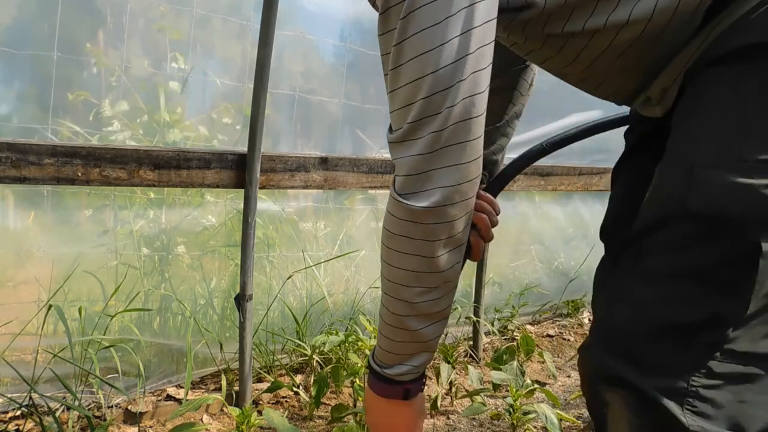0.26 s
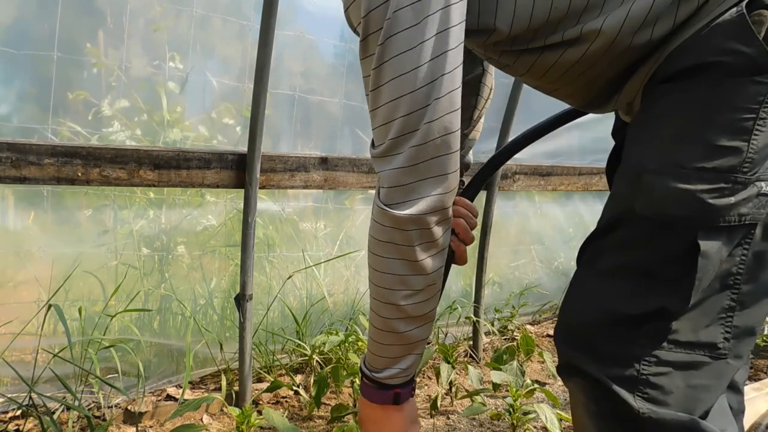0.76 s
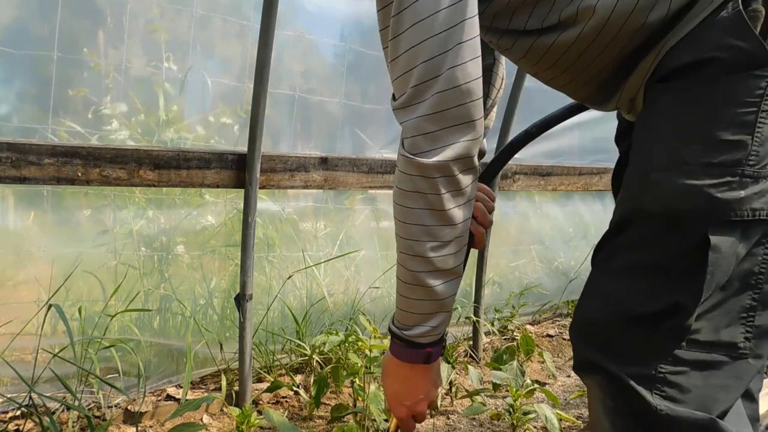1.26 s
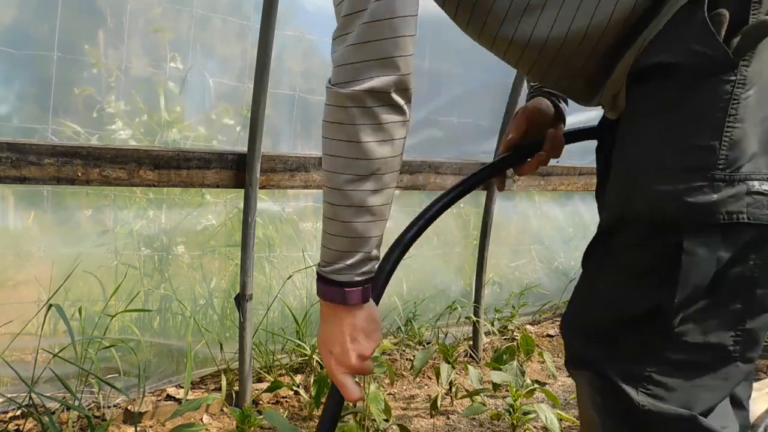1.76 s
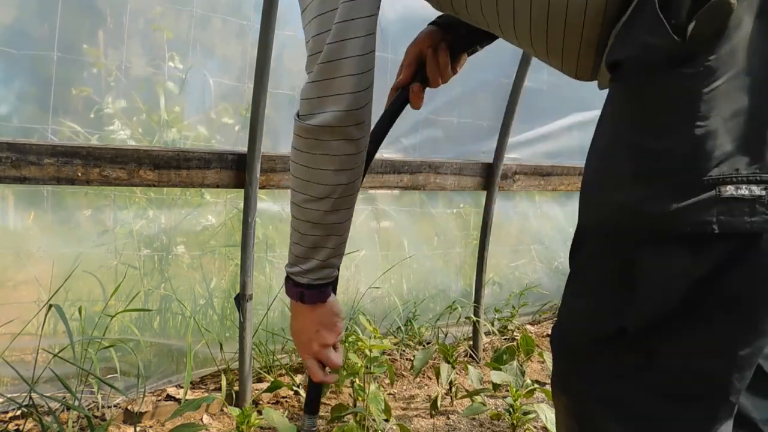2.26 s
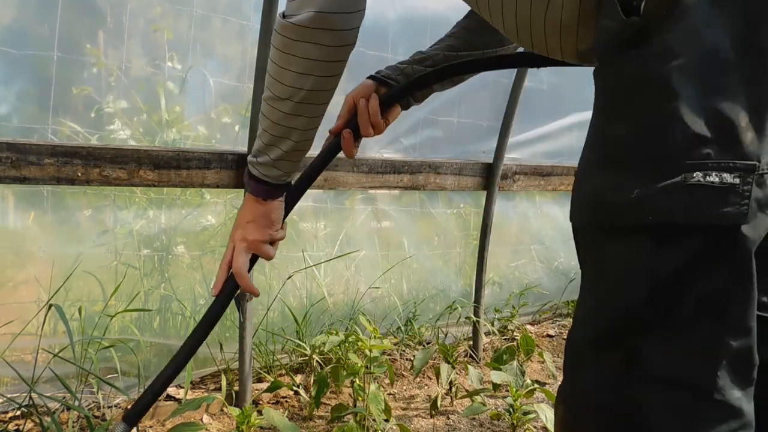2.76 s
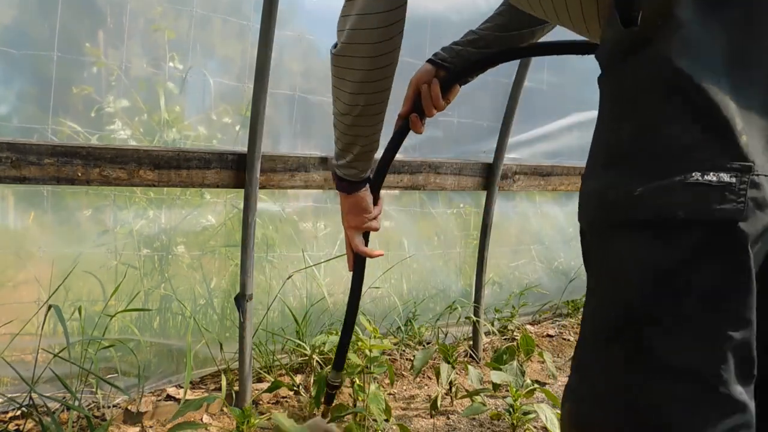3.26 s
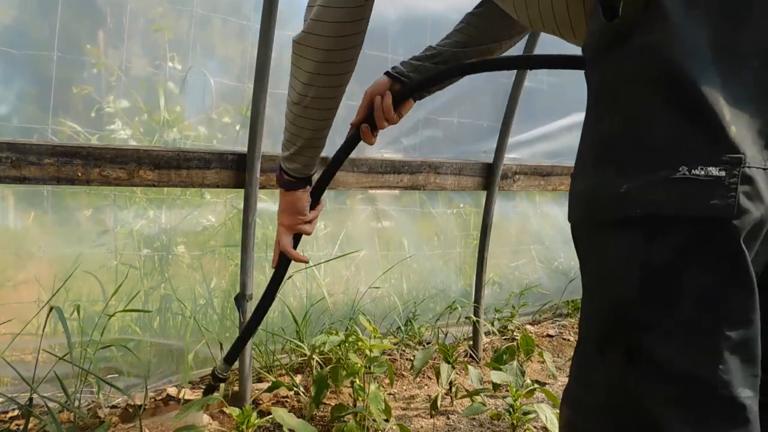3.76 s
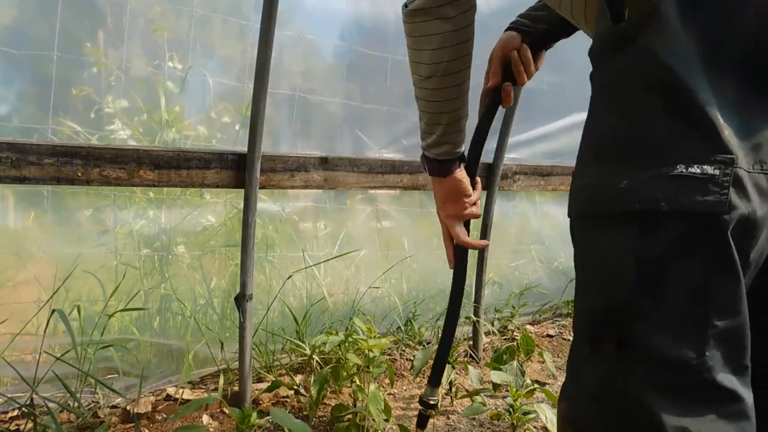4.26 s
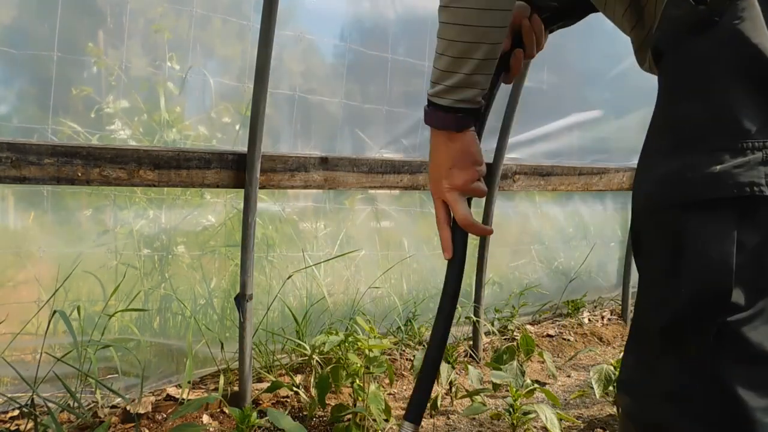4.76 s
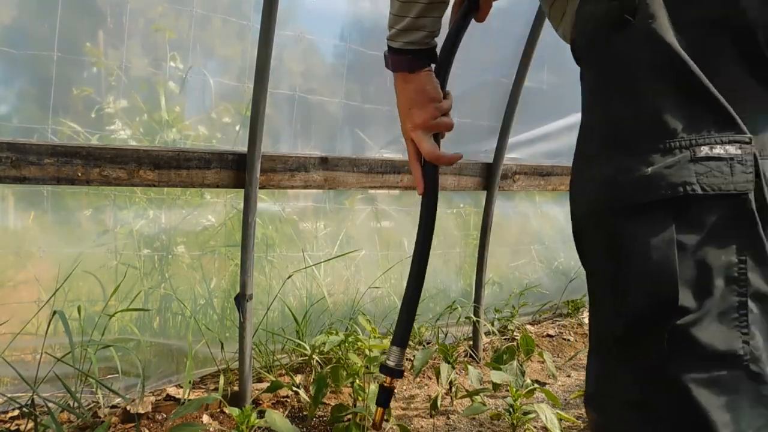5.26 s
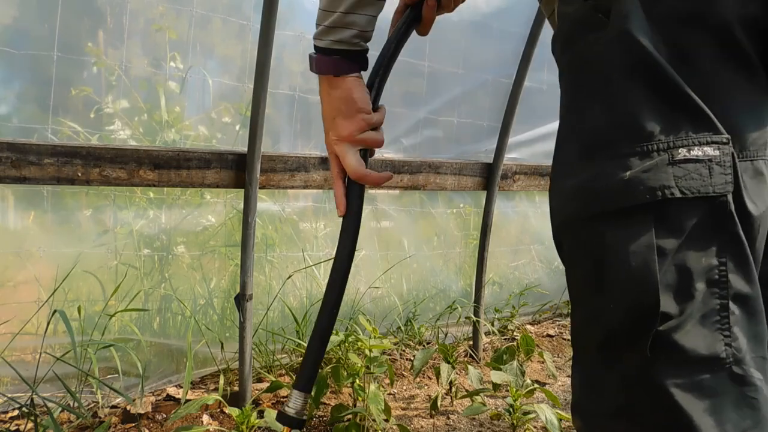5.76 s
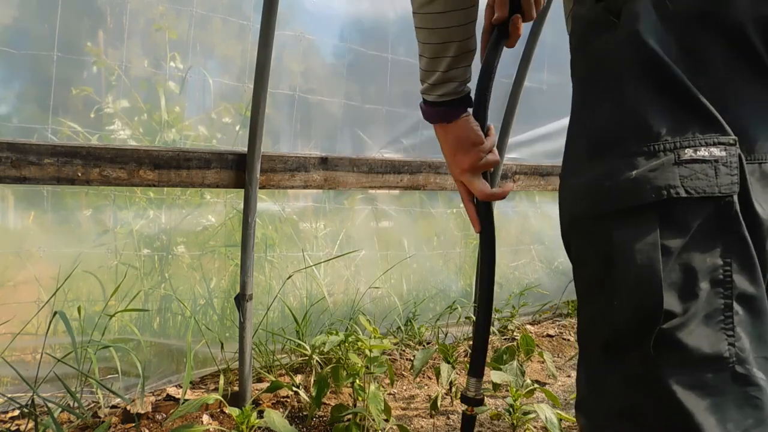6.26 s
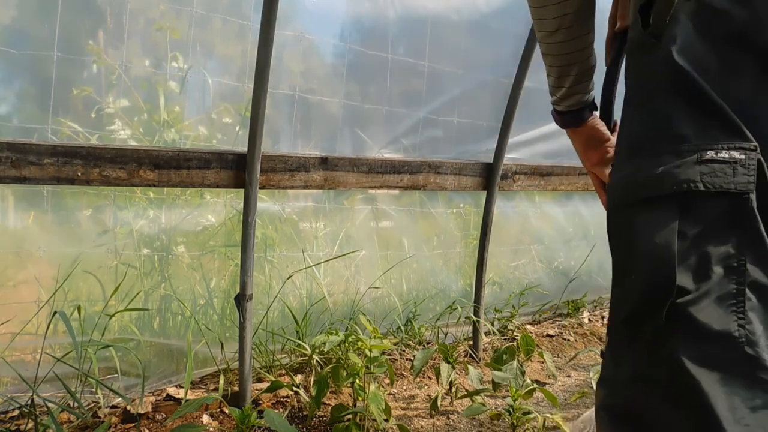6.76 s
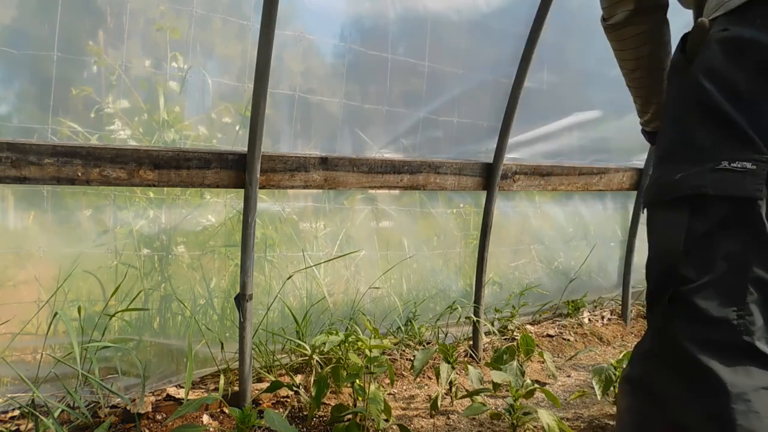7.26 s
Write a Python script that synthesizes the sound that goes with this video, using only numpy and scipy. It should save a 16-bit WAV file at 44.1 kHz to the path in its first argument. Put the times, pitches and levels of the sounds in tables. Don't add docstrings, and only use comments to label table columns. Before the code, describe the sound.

A garden hose sprays fine mist with a steady bright hiss, drops pattering on leaves and wet soil, after a few soft knocks at the start.

```python
import sys
import numpy as np
from scipy import signal
from scipy.fft import rfft, irfft, next_fast_len
from scipy.io import wavfile
from scipy.ndimage import map_coordinates

SR = 44100
rng = np.random.default_rng(int(sys.argv[2]) if len(sys.argv) > 2 else 0)


def master(y):
    cut = np.clip(np.atleast_2d(y).T, -1, 1)
    pcm = np.round(cut * 32767)
    wavfile.write(sys.argv[1], SR, pcm.astype(np.int16))


def natural_amplitude(level_db):
    exponent = np.asarray(level_db, float) / 20
    return 10 ** exponent


N = 331632


def jet():
    # pitch_hz, density_db (per Hz)
    hiss_spectrum = [(3000, -3), (3900, 1), (4800, 0), (7000, 1), (9000, -1.5), (11000, 0)]
    sizzle_spectrum = [(7500, 2), (10000, -1.5), (11500, 10), (13500, 4), (15500, 5), (18000, -3)]
    hiss = spray(hiss_spectrum, patchy_db=0.87, surge_db=0.3, spatter_db=0.9)
    sizzle = spray(sizzle_spectrum, patchy_db=1.34, surge_db=-0.04, spatter_db=1.25)
    return natural_amplitude(layer_level_db("hiss")) * hiss + natural_amplitude(layer_level_db("sizzle")) * sizzle


def landing():
    # pitch_hz, density_db (per Hz)
    patter_spectrum = [(1000, -7), (1180, 1.5), (1500, 3), (1900, 1.5), (2300, -6.5)]
    drumming_spectrum = [(300, -10), (430, -16.5), (520, -1), (620, -1.9), (800, -1.5), (950, -14)]
    splash_spectrum = [(690, -1.5), (870, -3.1), (1090, -3), (1380, -7.5)]
    ticking_spectrum = [(1850, 1), (2300, -0.3), (2900, 2), (3500, -1.5), (3900, -5.5), (4500, -18)]
    layers = ["patter", "drumming", "splash", "ticking"]
    patter_db, drum_db, splash_db, tick_db = map(layer_level_db, layers)
    out = natural_amplitude(patter_db) * spray(patter_spectrum, patchy_db=1.0, surge_db=0.0, spatter_db=1.26, count=5, size=4)
    out += natural_amplitude(drum_db) * spray(drumming_spectrum, patchy_db=0.5, surge_db=0.85, spatter_db=0.0, count=4, size=8)
    out += natural_amplitude(splash_db) * spray(splash_spectrum, patchy_db=0.0, surge_db=0.7, spatter_db=2.0, count=4, size=8)
    out += natural_amplitude(tick_db) * spray(ticking_spectrum, patchy_db=0.6, surge_db=-0.8, spatter_db=0.5, count=4, size=3)
    out[0] += natural_amplitude(patter_db - 15.5) * bubbles(per_s=900, low_hz=897, high_hz=3400, cycles=20.0)
    return out


def bubbles(per_s, low_hz, high_hz, cycles):
    heights = natural_amplitude(2.6 * np.minimum(rng.exponential(1, N), 5)) * rng.choice([-1, 1], N)
    born = rng.random(N) < per_s / SR
    dealt = rng.integers(0, 12, N)
    pitches = np.geomspace(low_hz, high_hz, num=12)
    ringing = 0
    for k, hz in enumerate(pitches):
        ringing = ringing + ring(heights * born * (dealt == k), hz, cycles / hz)
    return rms_one(ringing)


def hollow():
    # pitch_hz, density_db (per Hz)
    hollow_spectrum = [(880, -3), (990, 3), (1100, -3)]
    from_s, fill_s, full_db = 6.76, 0.3, -48.5
    fill = 0.5 + 0.5 * np.tanh((np.arange(N) / SR - from_s) / fill_s)
    ringing = spray(hollow_spectrum, patchy_db=1.5, surge_db=0.0, spatter_db=1.0, count=6, size=8)
    return natural_amplitude(full_db) * fill * ringing


def knocks():
    # start_s, peak_db, pitch_hz, t60_s
    hose_knocks = [(0.017, -34, 442, 0.093), (0.018, -43, 665, 0.035), (0.024, -49, 187, 0.099),
                   (0.033, -31, 332, 0.035), (0.05, -45, 260, 0.071), (0.11, -54, 200, 0.065),
                   (0.227, -31, 124, 0.024), (0.228, -46, 256, 0.035), (0.255, -46, 70, .08),
                   (0.295, -39, 477, 0.044), (0.519, -52, 194, .3)]
    out = np.zeros(N)
    for s, db, hz, t60 in hose_knocks:
        push = np.zeros(SR)
        push[round(s * SR)] = natural_amplitude(db)
        soft = signal.butter(1, [hz / 1.35, hz * 2.1], "band", fs=SR, output="sos")
        out[:SR] += signal.sosfilt(soft, ring(push, hz, t60))
    return out


def stir():
    # pitch_hz, density_db (per Hz)
    air_spectrum = [(70, -10), (100, -9), (165, 4.5), (250, -3.5), (330, 0), (420, 7), (560, 0)]
    handling_db, end_s, fade_s = -56, 0.32, 0.046
    handling = 0.5 - 0.5 * np.tanh((np.arange(N) / SR - end_s) / fade_s)
    gain = np.hypot(natural_amplitude(layer_level_db("air")), natural_amplitude(handling_db) * handling)
    return gain * spray(air_spectrum, patchy_db=2.2, surge_db=-0.1, spatter_db=-1.5, size=16)


def rumble():
    # pitch_hz, density_db (per Hz)
    rumble_spectrum = [(18, -10), (30, -8), (60, 2.5), (90, -5), (140, -12)]
    return natural_amplitude(-73.5) * spray(rumble_spectrum, patchy_db=2.0, surge_db=-1.0, spatter_db=2.0, size=32)


def layer_level_db(layer):
    # time_s, spray_strength_db, turned_to_ports_db, bare_wet_soil_db, standing_water_db
    swing = [(0, -6, -3, 1.5, -3), (0.31, -7, -3, 0.5, 0), (0.42, 0.5, -5, -1.5, -2.5),
             (0.62, -3, 1, 1, -2), (0.78, -0.5, -2, 3, -4.5), (1.5, 2, 0, 3.5, 0), (2.1, 0.5, 1, 0.5, 3),
             (2.33, 1, 0, 1, 0.5), (2.5, -1, -0.5, -7.5, 0.5), (2.7, -1.5, 0.5, -3, -1),
             (3.1, -1.5, 1.5, -3.5, -0.5), (3.4, -2.5, 1.5, -3.5, 2), (4.5, 0, -0.5, -3, 0),
             (4.85, -0.5, 3, 2.5, 0), (5.4, 1.5, 3, 3, 2.5), (6.25, 1, 3.5, 3, 0), (6.6, 1, -3.5, 0.5, 0.6),
             (7.52, -1, -2, -2.5, 5)]
    # middle_s, length_s, change_db, brightness_oct (from 2 kHz)
    crossings = [(1.6, 0.053, -9, -3), (1.915, .12, 2, -0.2), (2.254, 0.19, 4, 0.15), (2.28, .25, -12, -4),
                 (2.51, 0.072, 3.5, 0.7), (2.835, 0.096, 5, -1.8), (3.015, 0.14, 3.5, -1.5),
                 (3.263, 0.13, 3.5, 0), (3.405, 0.074, -0.5, .8), (3.502, .06, 6.5, 1),
                 (3.537, .035, -4.5, .5), (3.637, .13, 7, 1.46), (3.76, 0.11, -0.5, -3),
                 (3.967, 0.12, 2.5, 1), (4.096, 0.11, 7, 0.55), (4.2, 0.052, -3, -1.5),
                 (4.302, 0.096, 3, 3), (4.51, 0.079, 1, 0.5), (4.64, 0.11, -5, 1.3), (4.91, 0.1, 2.5, -0.8),
                 (5.19, .05, -0.5, 1.4), (5.564, 0.18, 1.5, 0.6), (5.66, 0.067, -3.5, -.2),
                 (5.743, 0.042, 0.5, -8), (5.814, .09, -4.5, 0.8), (6.074, 0.076, 3.5, 1.1),
                 (6.155, .05, 2, 8), (6.42, 0.27, 2, 5), (7.105, 0.11, -1.5, -0.5), (7.43, 0.066, 3, -1.1)]
    follows = {"hiss": (-34, 0.8, 0.92, 0.04, -0.04), "sizzle": (-32, 1, 1.02, 0.17, 0.2),
               "patter": (-40, 1.03, -0.25, 0.15, -0.4), "drumming": (-49, 0.7, -0.1, 1.17, -0.04),
               "splash": (-49, 0.9, -0.03, 0.74, 1.07), "ticking": (-38, 1.12, 0.07, -0.11, .05),
               "air": (-61, 1.9, -0.1, 0.2, 1.3)}
    layer_octaves = {"hiss": 1.4, "sizzle": 3.2, "patter": -0.13, "drumming": -1.44, "splash": -0.34,
                     "ticking": .45, "air": -3}
    edge_s, reach_oct = 0.035, 1.6

    mean_db, *shares = follows[layer]
    out = mean_db + np.dot(shares, in_time(swing))
    t = np.arange(N) / SR
    for s, length, db, bright in crossings:
        near = slice(round((s - 0.3) * SR), round((s + 0.3) * SR))
        shape = 0.5 - 0.5 * np.tanh((abs(t[near] - s) - length / 2) / edge_s * 2)
        out[near] += db * shape * np.exp(-((layer_octaves[layer] - bright) / reach_oct) ** 2)
    return out


def spray(spectrum, patchy_db, surge_db, spatter_db, count=3, size=1):
    # pitch_hz, share (0-1)
    direct_share = [(40, 0.35), (130, 0.6), (300, 0.85), (640, 1), (1400, 0.83), (2200, 0.85), (3500, 0.28),
                    (7000, .27), (15000, .3)]
    lowest_hz, octaves = spectrum[0][0], np.log2(spectrum[-1][0] / spectrum[0][0])
    edges = lowest_hz * 2 ** np.arange(0, octaves + 0.2, 1 / count)
    shared = flutter((surge_db, 12), (spatter_db, 300), size=size)
    white = rng.standard_normal((2, 3, len(shared)))
    out = 0
    for k, (low, high) in enumerate(zip(edges, edges[1:])):
        hz = np.sqrt(low * high)
        band_pass = signal.butter(2, [low, high], "band", fs=SR / size, output="sos")
        band = signal.sosfilt(band_pass, white[k % 2])
        share = np.clip(at_hz(direct_share, hz), 0, 1)
        weight = natural_amplitude(at_hz(spectrum, hz)) * np.sqrt([[share], [1 - share], [1 - share]])
        out = out + band * weight * flutter((patchy_db, 8), size=size)
    out = signal.resample_poly(out * shared, size, 1, axis=1)[:, :N]
    return out / np.sqrt(np.mean(out[0] ** 2 + out[1] ** 2))


def flutter(*parts, size=1):
    total_db = 0
    for depth_db, rate in parts:
        r = np.exp(-40 * np.pi * rate / SR)
        chance = rng.standard_normal(N // 20 + 2002)
        slow = signal.lfilter([1], [1, -2 * r, r * r], chance)[2000:]
        total_db = total_db + depth_db * rms_one(slow)
    return np.interp(np.arange(0, N, size) / 20, np.arange(len(total_db)), natural_amplitude(total_db))


def ring(clicks, hz, t60):
    r, w = natural_amplitude(-60 / (t60 * SR)), 2 * np.pi * hz / SR
    return signal.lfilter([0, np.sin(w)], [1, -2 * r * np.cos(w), r * r], clicks + 1e-18)


def tunnel(x, wall_db, wall_hz, echo_hz):
    # time_s, extra_path_ms
    near_wall = [(0, 3.12), (2.25, 3.44), (2.6, 2.7), (4.4, 2.7), (4.8, 3.36), (6.4, 3.28), (6.9, 3.1),
                 (7.52, 2.8)]
    # extra_path_ms, gain_db, wander_ms
    echoes = [(4.3, -18, 0.33), (6.1, -18, .45), (8.8, -13.5, .6), (12.2, -16, .8)]
    wall_dull = signal.sosfilt(signal.butter(2, wall_hz, fs=SR, output="sos"), x)
    out = x + natural_amplitude(wall_db) * late(wall_dull, in_time(near_wall)[0])
    dull = signal.sosfilt(signal.butter(1, echo_hz, fs=SR, output="sos"), x)
    for ms, db, wander in echoes:
        sway = np.log(flutter((20 / np.log(10), 0.7)))
        out = out + natural_amplitude(db) * late(dull, ms + wander * sway)
    return out


def late(x, ms):
    at = np.clip(np.arange(N) - ms * SR / 1000, 0, N - 2)
    whole = at.astype(int)
    return x[:, whole] + (at - whole) * (x[:, whole + 1] - x[:, whole])


def at_ports(direct, diffuse):
    # time_s, left_lead_us, left_minus_right_db
    place = [(0, 28, 0.5), (0.6, 24, 1.2), (1, 25, 1), (2, 37.5, 1), (2.7, 59.5, 1.5), (3.3, 35.5, 0.5),
             (3.62, 52, 1), (3.85, 39, 1), (4.2, 24, 0.8), (5, 31, 1.4), (6.2, 40.5, 1), (6.8, 3, 1.5),
             (7.52, -12, 0)]
    # pitch_hz, left_minus_right_db
    tilt = [(60, -2), (300, -2), (1500, -2), (3500, -2.5), (8000, 0.2), (12000, 1.7), (15000, 2.5)]
    lead_us, pan_db = in_time(place)
    half = lead_us * SR / 2e6
    pair = [map_coordinates(direct, [np.arange(N) + s * half], order=3, mode="nearest") for s in (1, -1)]
    pair = (np.array(pair) + diffuse) * natural_amplitude(pan_db / 2 * [[1], [-1]])
    size = next_fast_len(N)
    hz = np.arange(1, size // 2 + 2) * SR / size
    colour = natural_amplitude(at_hz(tilt, hz) / 2 * [[1], [-1]]) * (hz < 15760)
    return irfft(rfft(pair, size) * colour, size)[:, :N]


def rms_one(x):
    return x / np.sqrt(np.mean(x ** 2) + 1e-20)


def in_time(rows):
    s, *columns = np.transpose(rows)
    return [np.interp(np.arange(N) / SR, s, c) for c in columns]


def at_hz(points, hz):
    point_hz, value = np.transpose(points)
    return np.interp(np.log(hz), np.log(point_hz), value)


def scene():
    field = tunnel(jet() + landing(), wall_db=-14.5, wall_hz=2020, echo_hz=8900)
    field += hollow()
    field[0] += knocks()
    field += stir() + rumble()
    return at_ports(field[0], field[1:])


def roll_off(x):
    return signal.sosfilt(signal.butter(12, 17040, fs=SR, output="sos"), x)


def record(dry):
    return roll_off(dry)


dry = scene()
out = record(dry)
master(out)
```